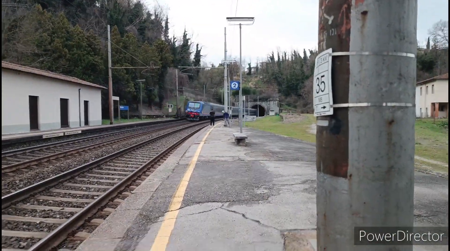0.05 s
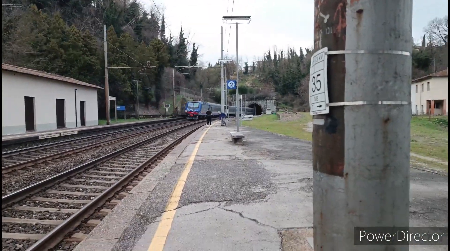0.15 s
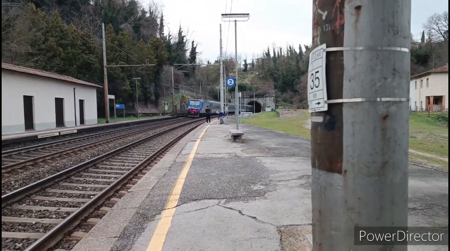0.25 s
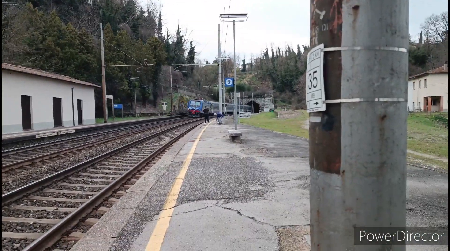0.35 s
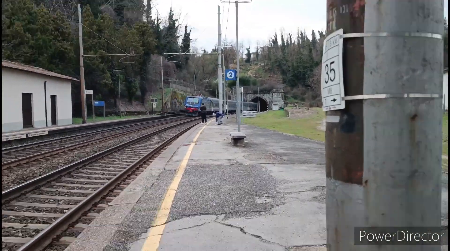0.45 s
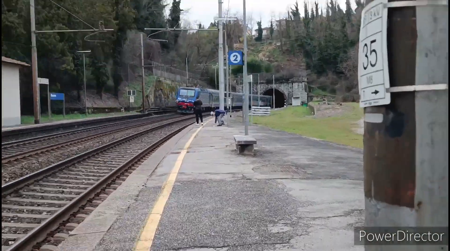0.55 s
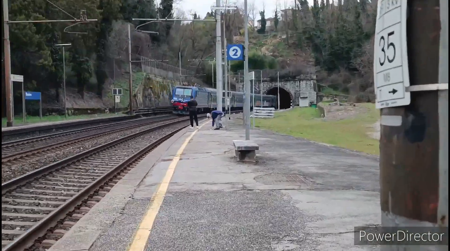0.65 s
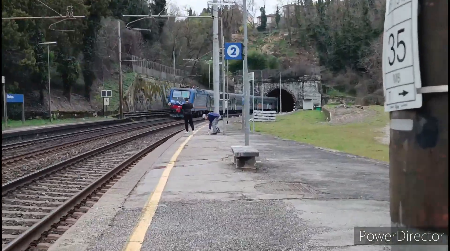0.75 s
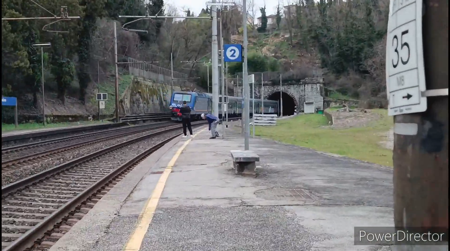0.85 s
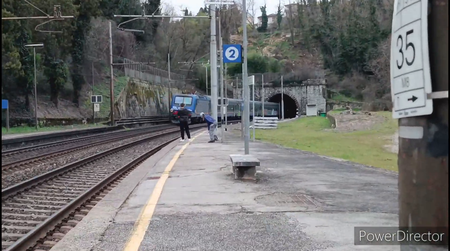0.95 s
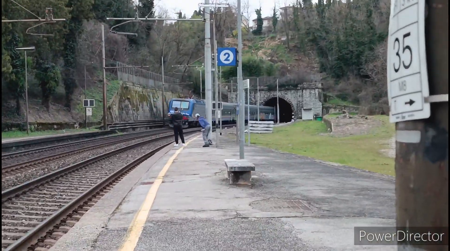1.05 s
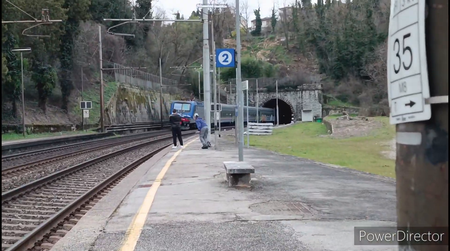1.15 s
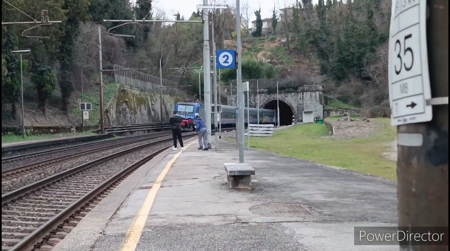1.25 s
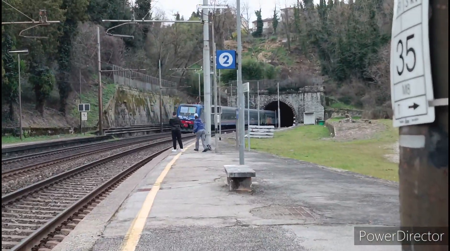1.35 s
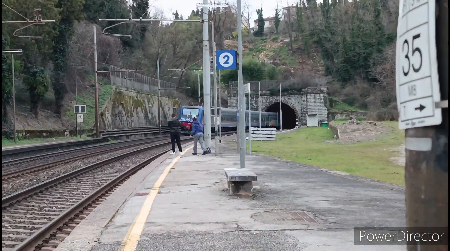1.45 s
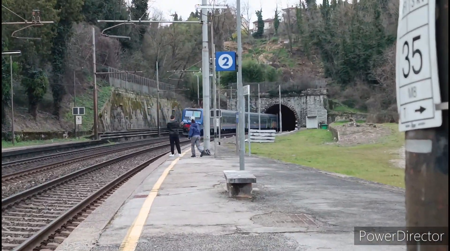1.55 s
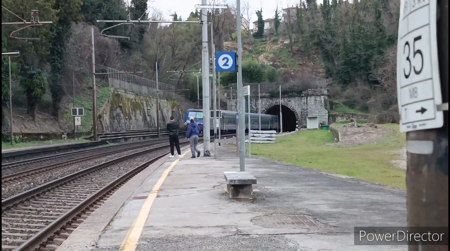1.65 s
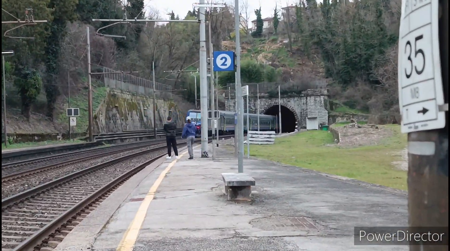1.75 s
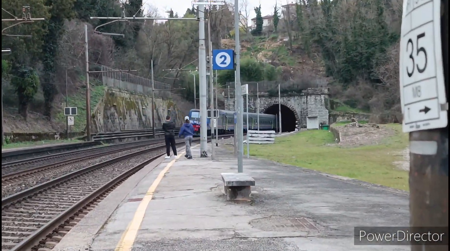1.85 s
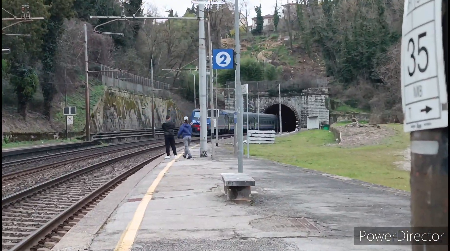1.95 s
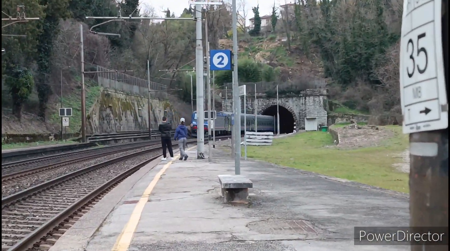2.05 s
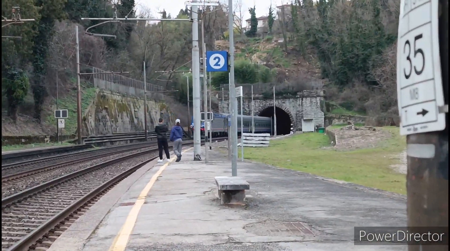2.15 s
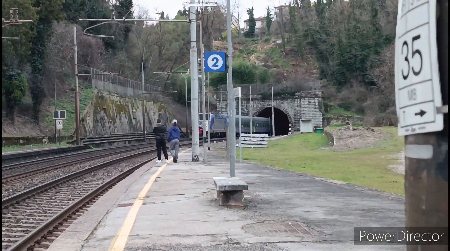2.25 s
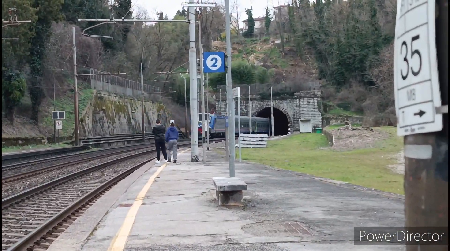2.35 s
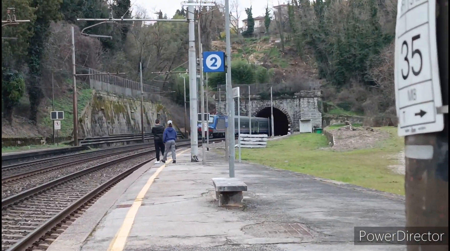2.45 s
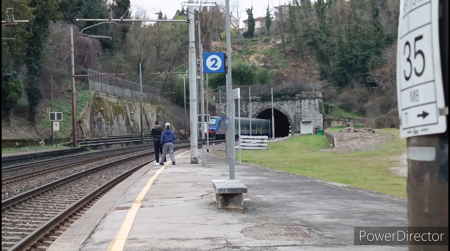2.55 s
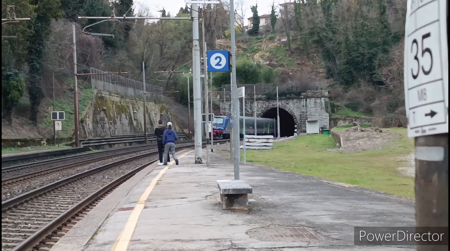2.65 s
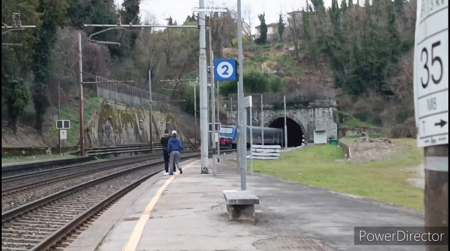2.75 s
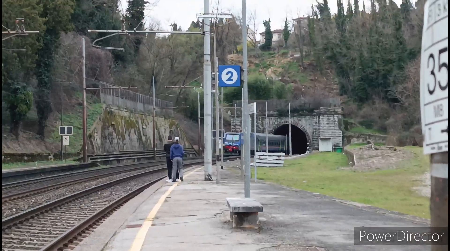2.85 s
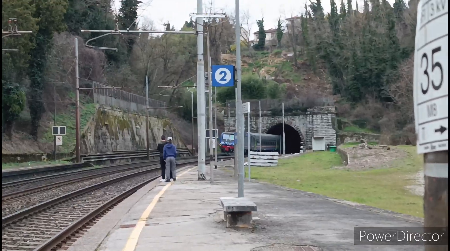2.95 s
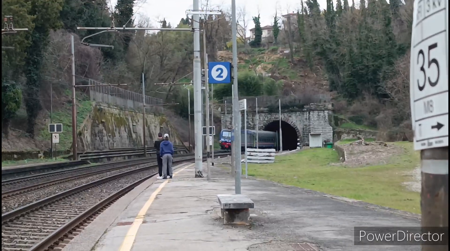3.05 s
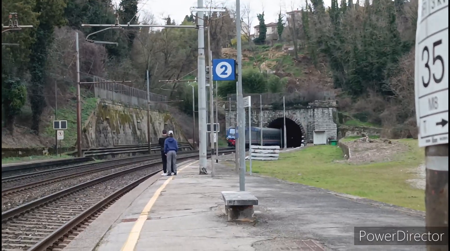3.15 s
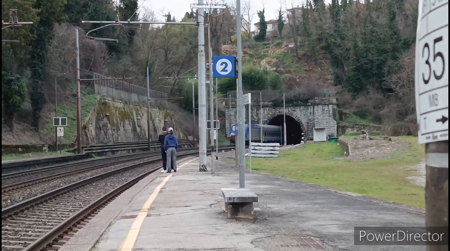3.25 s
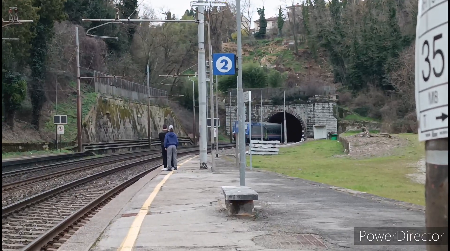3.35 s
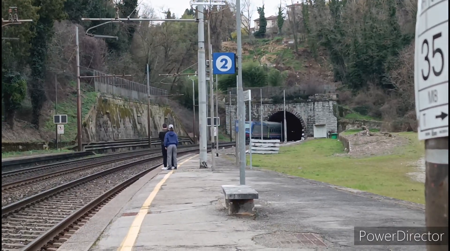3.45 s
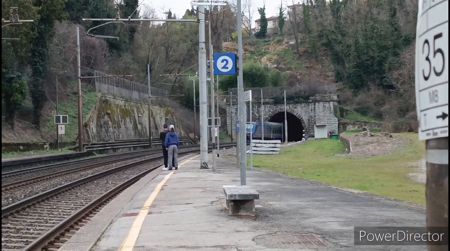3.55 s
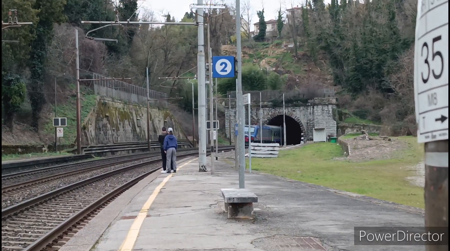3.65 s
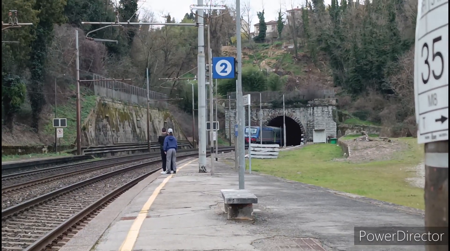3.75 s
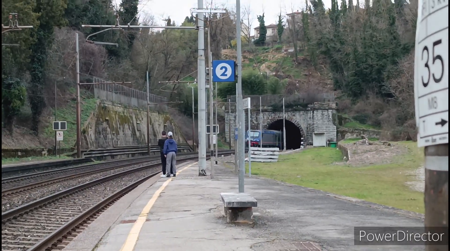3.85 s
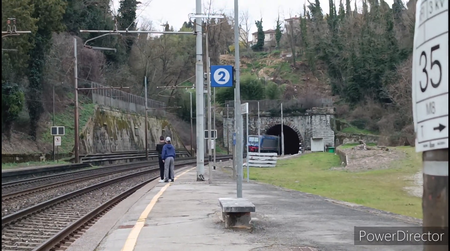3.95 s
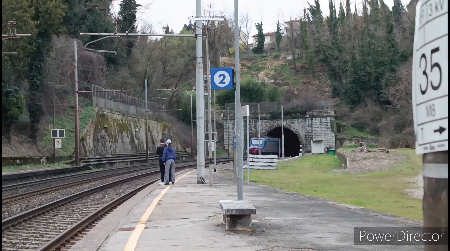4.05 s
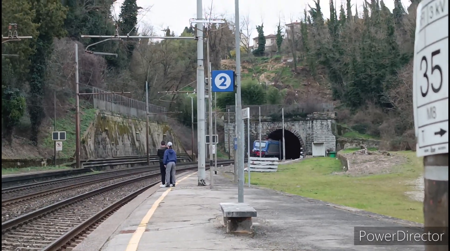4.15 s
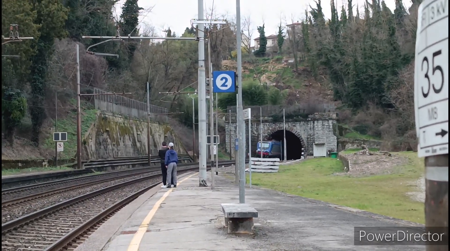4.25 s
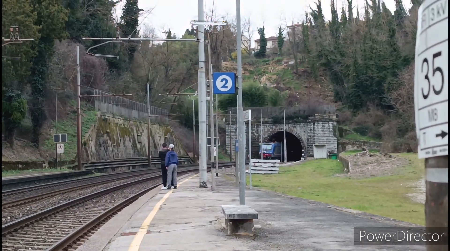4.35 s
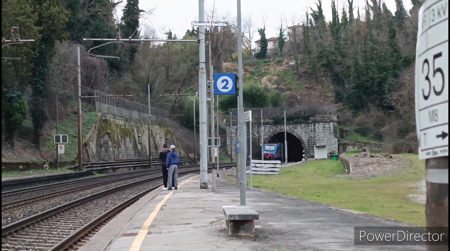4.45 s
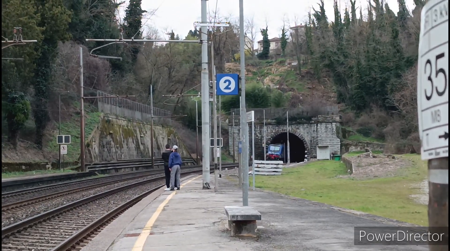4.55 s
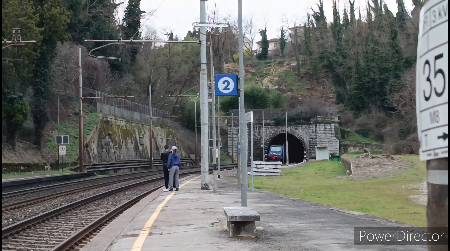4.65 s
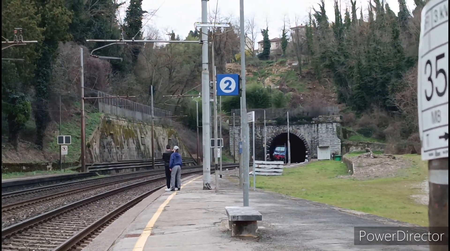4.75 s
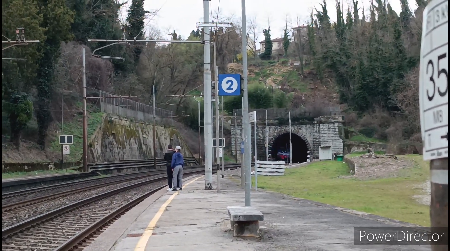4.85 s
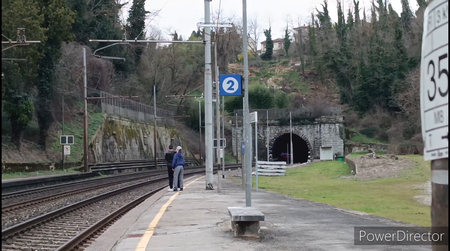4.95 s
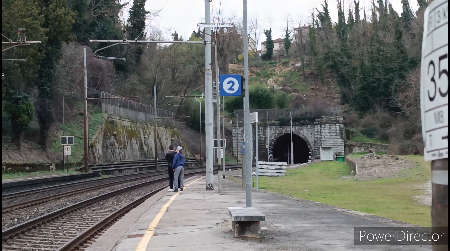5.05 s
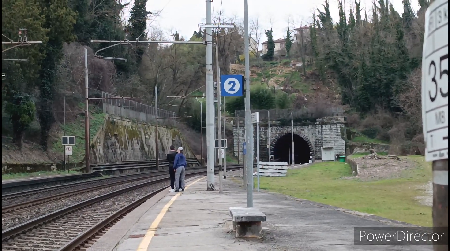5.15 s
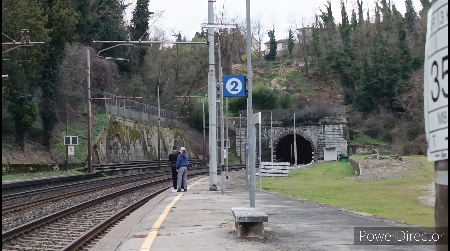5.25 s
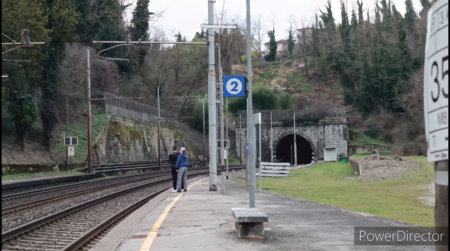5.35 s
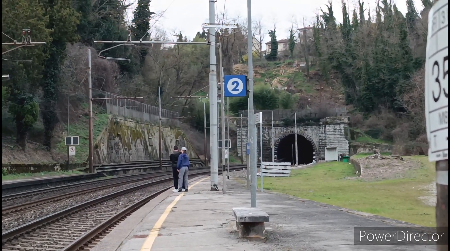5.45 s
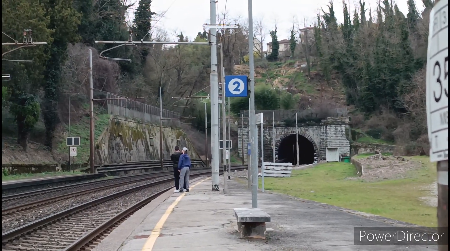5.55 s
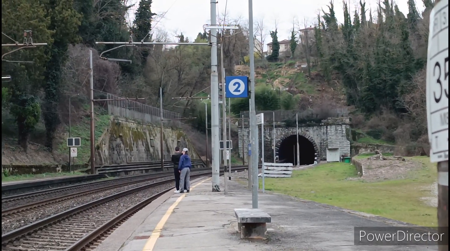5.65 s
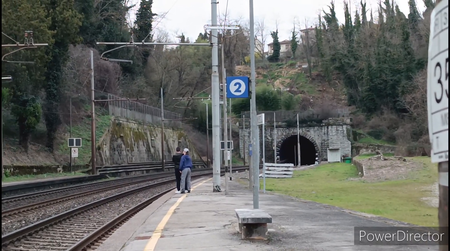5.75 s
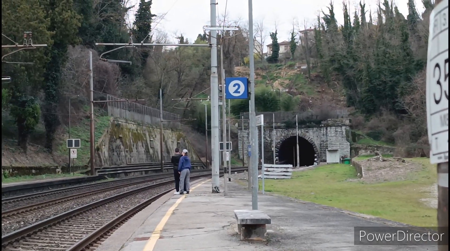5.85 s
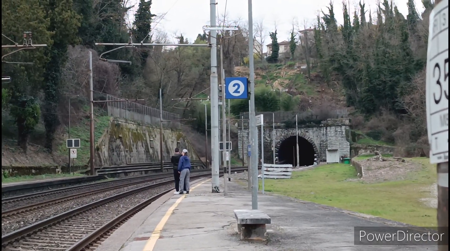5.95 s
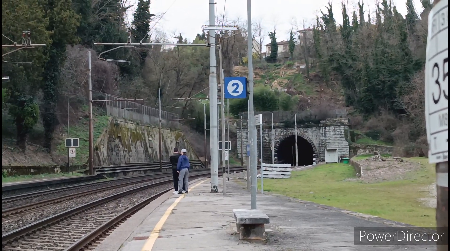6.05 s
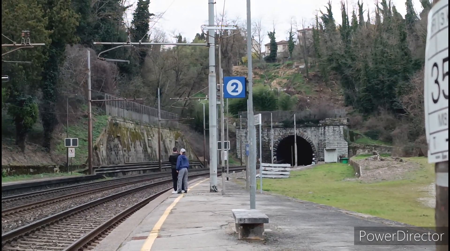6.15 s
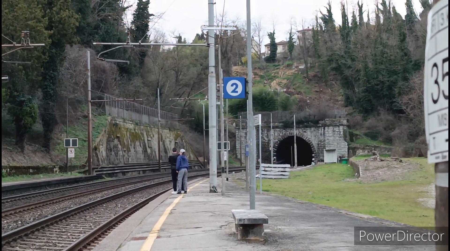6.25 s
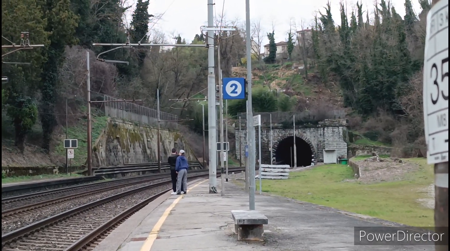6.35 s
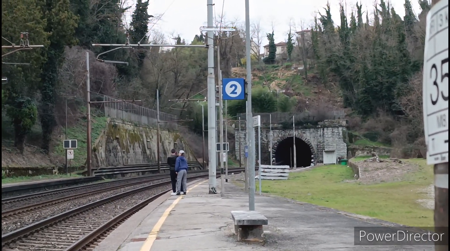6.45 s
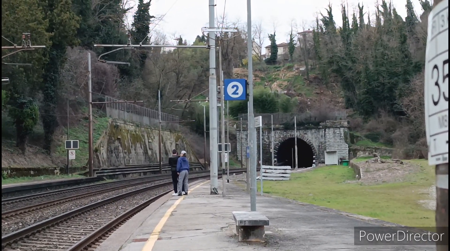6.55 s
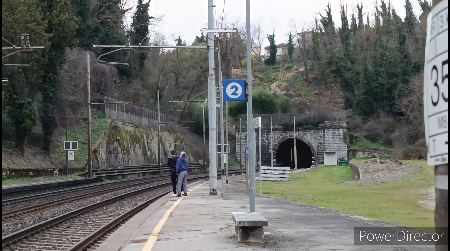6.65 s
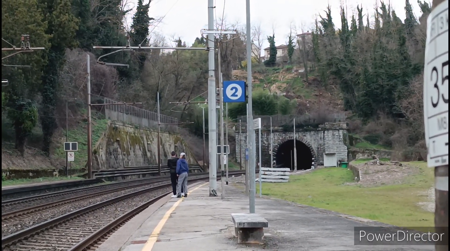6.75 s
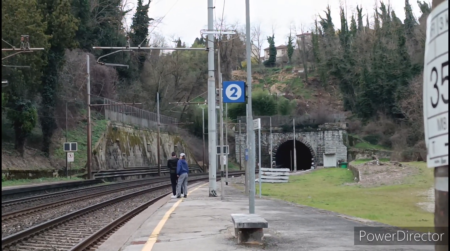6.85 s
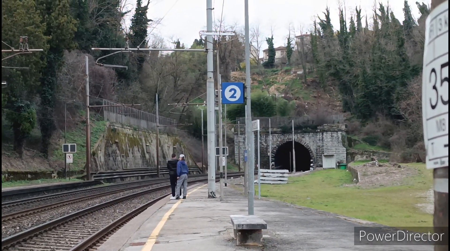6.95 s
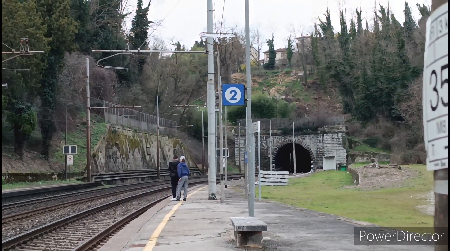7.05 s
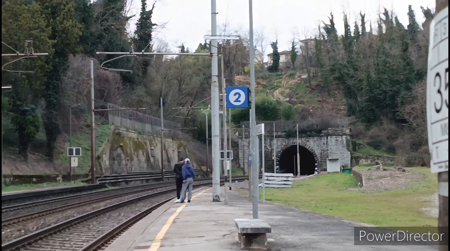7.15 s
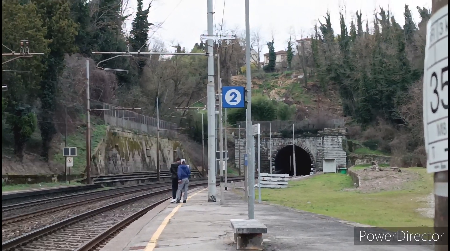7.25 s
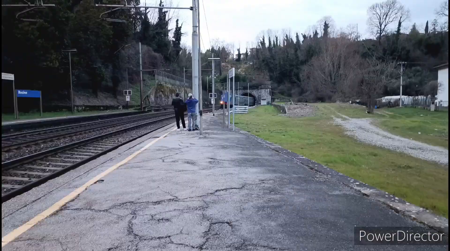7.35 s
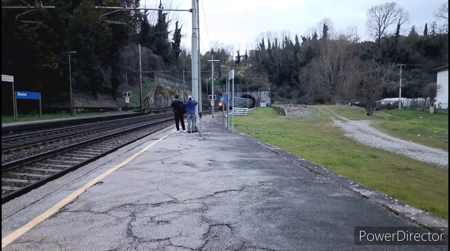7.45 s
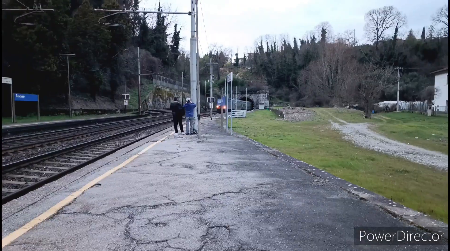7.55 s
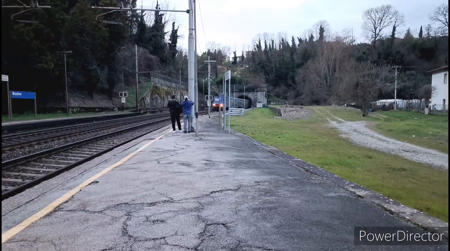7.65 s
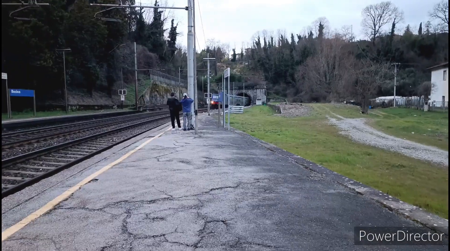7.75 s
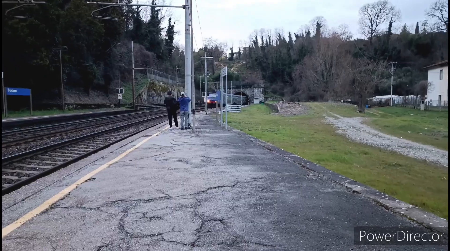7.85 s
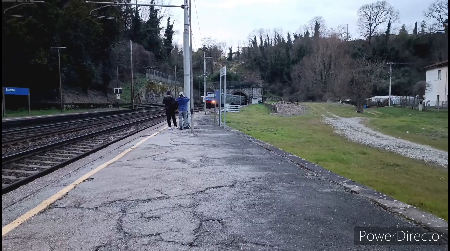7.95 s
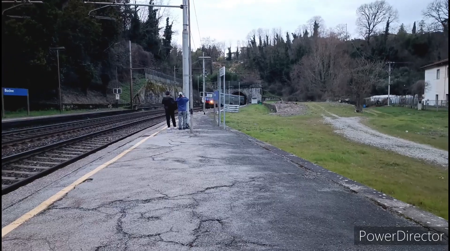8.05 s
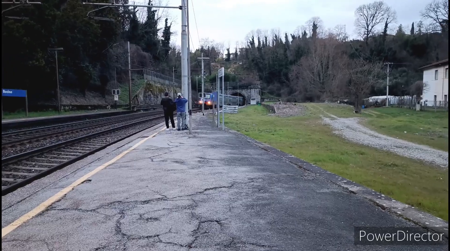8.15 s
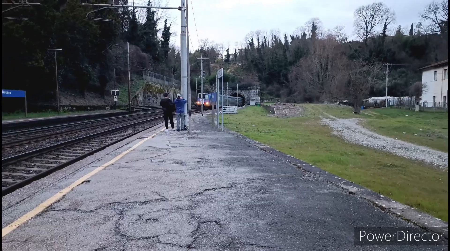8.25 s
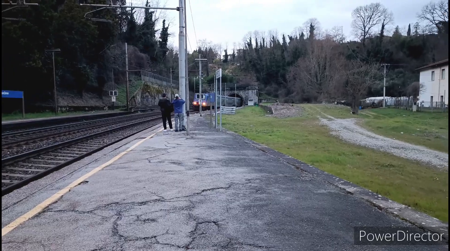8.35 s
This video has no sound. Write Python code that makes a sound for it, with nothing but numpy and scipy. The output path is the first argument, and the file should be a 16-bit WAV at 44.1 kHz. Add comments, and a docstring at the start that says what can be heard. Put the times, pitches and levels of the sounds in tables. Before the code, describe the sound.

An electric train rolls away round a curve, rumbling, hissing and squealing thinly as wind bumps the microphone; brief silence, then a second distant train.

```python
"""Station platform by a tunnel mouth: an electric train rolls slowly round a curve and draws away. Its bodies
boom near 200 Hz and the wheels roar (coloured noise); the flanges hiss (noise), ring (narrow noise bands) and
squeal (wavering sines). Wind bumps the microphone (gusts of low noise). After a short break the scene changes:
the sound fades in on a second train approaching from afar."""
import sys
import numpy as np
from scipy import signal
from scipy.fft import irfft, next_fast_len
from scipy.io import wavfile

SR = 44100
rng = np.random.default_rng(int(sys.argv[2]) if len(sys.argv) > 2 else 0)


def wrap_up_sound(samples):
    """Save the sound to the file named by the first command line argument, as 16-bit audio."""
    columns = np.atleast_2d(samples).T
    # keep every value between -1 and 1, then stretch to whole-number steps
    tamed = np.clip(columns, -1, 1)
    steps = np.round(tamed * 32767).astype(np.int16)
    wavfile.write(sys.argv[1], SR, steps)


N = 370881
TIME = np.arange(N) / SR
FREQS = np.maximum(np.fft.rfftfreq(next_fast_len(N, real=True), 1 / SR), 1)

# All table levels are relative; widths are half widths at half amplitude.
# Noise colours of open air, wind turbulence, deepest rumble: (frequency [Hz], density [dB])
AIR = [(330, 4), (480, -0.5), (800, -6.5), (1600, -18.5), (4000, -35), (6000, -19.5), (9000, -54)]
WIND = [(30, -48), (48, -40), (70, -2.5), (95, 3.5), (170, -0.5), (300, -5), (450, -20.5), (900, -38)]
DEEP = [(45, -30), (75, -6), (105, 1), (135, -1), (165, -13)]
# Noise colours of body rumble, wheel roar, rail hiss, wheel sizzle: (frequency [Hz], density [dB])
RUMBLE_AWAY = [(21, -96), (35, -49), (60, -28), (79, -19.5), (118, -15.5), (185, -0.5), (211, -1),
               (260, -7.5), (300, -8.5), (390, -26), (660, -120)]
RUMBLE_NEAR = [(21, -72), (40, -35), (92, -6), (141, -2), (204, -0.5), (279, -6), (386, -12), (409, -23),
               (560, -14.5), (730, -58), (1230, -120)]
ROAR_AWAY = [(290, 12), (350, 8.5), (410, 11.5), (500, 4), (590, -1.5), (715, 7), (850, 1), (1030, 7),
             (1330, 6.5), (1480, -5.5), (1930, -2.5), (2300, -3), (3500, -4.5), (5200, -18)]
ROAR_NEAR = [(280, -33), (480, 2), (495, -3), (708, 6), (831, 3), (994, 10), (1180, 4), (1340, 10),
             (1470, -8), (1770, -4.5), (1900, -2.5), (2440, -7), (5200, -11.5), (6760, -31), (11400, -120)]
HISS_AWAY = [(4400, -8), (5000, 8.5), (5350, 3.5), (5700, 10), (6100, 5), (6600, 10), (7600, 4.5),
             (7950, 9.5), (8480, 7), (8750, -22), (9000, -70)]
HISS_NEAR = [(2760, -31), (4700, -22), (5410, -10), (5700, -5.5), (5980, -16), (6200, -5.5), (7360, -8),
             (7670, -8), (8410, -8), (9000, -34), (11700, -46), (19800, -120)]
SIZZLE = [(5880, -113), (10000, -24), (10600, -19), (12000, -8.5), (13700, -1), (14200, 2), (15000, 4.5),
          (15400, 1.5), (15500, -14)]
# Arrival from the left: (frequency [Hz], direct share [0-1], lag at right ear [ms])
EARS_AWAY = [(60, 0.6, 0), (130, 0.98, 0), (212, 1, 0.1), (337, 0.98, 0), (483, 0.6, 0.19),
             (870, 0.38, 0.11), (1087, 0.7, 0.46), (1310, 0.82, 0.48), (1510, 0.35, 0.42),
             (1890, 0.68, 0.53), (2780, 0, 0.32), (4700, 0, 0.52), (5500, 0.35, 0.554), (6300, 0, 0.52),
             (7000, 0.6, .495), (8000, 0.7, 0.508), (12000, 1, 0.483), (14700, 0.5, 0.542)]
EARS_NEAR = [(59.6, 1, 0), (282, 0.99, 0.06), (480, 0.59, 0.23), (795, 0.66, 0.38), (970, 0.58, 0.56),
             (1340, 1, 0.45), (1560, 0.72, 0.48), (1900, 0.66, 0.53), (2600, 0.12, 0.58),
             (7000, 0.25, 0.584), (14700, .45, 0.89)]
# Balance of the ears: (frequency [Hz], left minus right [dB])
BALANCE_DB = [(200, -0.5), (410, -2.5), (680, 2.5), (1300, 0.5), (2400, -3), (4200, -0.5), (5600, 3),
              (7000, 6.5), (9000, 3.5), (14000, 4)]
# Drone, 1 kHz throb, main body resonance: (frequency [Hz], width [Hz], level [dB])
DRONE_MODE = [(1347, 25, 0)]
THROB_MODES = [(710, 30, -39), (990, 70, 9), (1080, 45, -12), (1240, 48, 14), (1260, 27, -11)]
BODY_MODE = [(201, 18, 0)]
# Rail modes: within the hiss, under plain rolling, under the second train;
# then wheel modes: rubbed cluster, within the sizzle: (frequency [Hz], width [Hz], level [dB])
RAIL_MODES = [(6641, 9, -11.5), (6712, 15, -10), (6858, 16, -6), (7253, 10, -9), (7535, 12, -14)]
SONG_MODES = [(5285, 25, -9), (5400, 40, -10), (5496, 30, -7), (5600, 55, -5), (5730, 70, -6.5),
              (5850, 40, -11)]
RAIL_NOTE = [(5640, 80, -5), (5760, 32, 0), (6660, 50, -10), (7030, 110, -8), (7190, 66, -3.5),
             (7340, 70, -5)]
WHEEL_MODES = [(6930, 57, -5), (7055, 50, -8), (7114, 45, -10), (7300, 90, -9)]
SIZZLE_MODES = [(12600, 40, -6), (13120, 45, -5), (13420, 35, -5), (13900, 25, -4), (14116, 16, -1),
                (14262, 16, 3), (14356, 12, 2), (14460, 30, 3), (14578, 18, 3), (14795, 20, 5),
                (15071, 22, 3), (15290, 40, 1)]
# Wind gusts: (time [s], half length [s], left level [dB], right level [dB])
GUSTS = [(0.112, 0.073, -46, -38), (0.3, 0.022, -53.5, -25.5), (0.622, 0.029, -47, -25),
         (1.377, 0.065, -33.5, -38), (1.676, 0.039, -30.5, -46), (1.846, 0.071, -41, -35),
         (2.028, 0.054, -35.5, -32.5), (2.283, 0.15, -41, -34.5), (4.646, 0.013, -50, -27.5),
         (5.3, 0.055, -52, -34), (6.122, 0.03, -27.5, -29), (6.422, 0.033, -47, -29),
         (6.53, 0.022, -29, -44), (6.984, 0.038, -34, -45), (7.114, 0.022, -31.5, -47),
         (7.182, 0.052, -53, -33), (7.291, 0.033, -41, -16.5)]
# Body booms on uneven track: (time [s], half length [s], rise [dB])
JOLTS = [(0.03, 0.052, 4.5), (2.162, 0.023, 7), (2.436, 0.065, 5.5), (3.493, 0.062, 5), (3.776, 0.066, 3.5),
         (4.366, 0.012, 5.5), (4.857, 0.05, 4.5), (5.89, 0.021, 5.5), (8.314, 0.022, 4.5)]
# Dull knocks: (time [s], frequency [Hz], peak level [dB])
KNOCKS = [(0.184, 253, -19), (2.428, 217, -22), (6.113, 188, -22.5)]
# Small sharp ticks: (time [s], level [dB])
TICKS = [(6.545, -35), (7.112, -45)]
# Falling whine, faint whistle, puff as the sound returns, faint arching squeal of the second train:
# (time [s], frequency [Hz], level [dB])
WHINE = [(0.4, 454, -52), (0.56, 450, -51), (0.72, 438, -60), (0.81, 427, -35.5), (0.97, 408.3, -45),
         (1.05, 409, -36.5), (1.2, 398, -69)]
WHISTLE = [(6.49, 2900, -69), (6.53, 2960, -59), (6.63, 2730, -62), (6.73, 2540, -60), (6.83, 2450, -65)]
PUFF = [(7.386, 1300, -59), (7.398, 1124, -47), (7.412, 850, -52), (7.43, 650, -77)]
FAR_SQUEAL = [(7.62, 3260, -63), (7.7, 4050, -55), (7.77, 4400, -56), (7.84, 4070, -58), (7.92, 3440, -64)]
# Short wheel squeaks, second train: (time [s], half length [s], level [dB])
SQUEAKS = [(7.978, 0.013, -41), (8.048, 0.0072, -52), (8.085, 0.014, -51), (8.12, 0.014, -45)]
# Flange after flange pressing on the curve's rail:
# (start [s], length [s], rub level [dB], wheel ring level [dB])
RUBS = [(0.034, 0.071, 1.5, 9), (0.315, 0.34, -2, 6), (0.615, 0.15, -0.5, 7.5), (0.996, 0.17, -5, 2.5),
        (1.214, 0.093, -1, 10), (1.432, 0.26, -1.5, 4), (1.76, 0.2, 1.5, 5), (2.172, 0.32, -1.5, 1.5),
        (2.84, 0.59, -2, -1), (3.62, 0.96, -2, 1.5), (4.626, 0.17, -3.5, 7), (4.945, 0.048, -8, -15),
        (5.86, 0.17, 0, 7.5), (6.237, 0.25, 2, 4.5), (6.54, 0.2, 4, 16.5), (6.865, 0.066, 2, 19)]
# Squeal pitches: mode name -> frequency [Hz]
SQUEAL_HZ = {"low": 14356, "middle": 14769, "high": 15071}
# Thin squeals: (start [s], length [s], level [dB], mode name)
SQUEALS = [(1.06, .2, -50, "middle"), (1.3, 0.15, -41.5, "middle"), (1.57, 0.5, -50, "middle"),
           (6.552, 0.32, -49, "middle"), (0.72, 0.91, -48, "high"), (2.33, 1.0, -41, "high"),
           (7.382, 0.87, -42, "low"), (8.318, .1, -37, "low")]

BREAK_START_S, BREAK_END_S = 7.326, 7.382
FADE_IN_S = 0.097  # time constant
CUTOFF_HZ = 15550
THROB_PER_S, THROB_CENTER_S = 7.32, 0.108
SQUEAK_HZ = 1907
RUMBLE_FADE_DB_PER_S, ROAR_FADE_DB_PER_S, HISS_FADE_DB_PER_S = 0.92, 2, 5.5
RING_FADE_DB_PER_S, SIZZLE_FADE_DB_PER_S = 3, 3
SIZZLE_PEAK_S = 1.0  # sizzle grows until then, fades after
APPROACH_DB_PER_S = 1.1
RUB_ATTACK_S, RUB_RELEASE_S = 0.071, 0.08
SQUEAL_ATTACK_S, SQUEAL_RELEASE_S = 0.11, 0.06
CURVE_END_S, RAIL_SONG_END_S = 3.58, 4.85
GRAZE_DB, EASED_DB = -8.5, -14  # flange rub between the RUBS: in the curve, after it eases
GRAZE_RING_DB, EASED_RING_DB = 0, -4
HISS_FOLLOWS = 0.75  # share of the rub's dB swing that the hiss follows


def from_db(db):
    """Decibels to gain."""
    return 10 ** (np.asarray(db) / 20)


def rms_one(x):
    """Scale to unit rms."""
    return x / np.sqrt(np.mean(x ** 2) + 1e-20)


def at_freqs(points):
    """Gain at every frequency, interpolated in dB over log frequency."""
    hz, db = np.transpose(points)
    return from_db(np.interp(np.log(FREQS), np.log(hz), db))


def band(points):
    """Gain as at_freqs, with steep skirts outside the table."""
    below = points[0][0] / FREQS
    above = FREQS / points[-1][0]
    outside = np.maximum(np.maximum(below, above), 1)
    return at_freqs(points) / outside ** 20


def resonances(modes):
    """Summed gain of resonance peaks."""
    return sum(from_db(db) / (1 + ((FREQS - hz) / width) ** 2) for hz, width, db in modes)


def white(count):
    """Spectra of unrelated white noises."""
    shape = (count, len(FREQS))
    return rng.standard_normal(shape) + 1j * rng.standard_normal(shape)


def noise(gain):
    """Mono noise of the given colour, rms 1."""
    return rms_one(irfft(white(count=1)[0] * gain)[:N])


def drift(rate_hz):
    """Low-passed random wander, rms 1, drawn at every 40th sample and interpolated."""
    pole = np.exp(-2 * np.pi * rate_hz * 40 / SR)
    draws = rng.standard_normal(N // 40 + 1002)
    slow = signal.lfilter([1], [1, -2 * pole, pole * pole], draws)[1000:]  # drop filter start-up
    return np.interp(np.arange(N) / 40, np.arange(len(slow)), rms_one(slow))


def wide_noise(gain, ears):
    """Stereo noise of about rms 1: a direct share reaches the right ear late, the rest is scattered."""
    hz, *columns = np.transpose(ears)
    direct, lag_ms = [np.interp(np.log(FREQS), np.log(hz), column) for column in columns]
    direct = np.clip(direct, 0, 1)
    lean = np.sqrt(at_freqs(BALANCE_DB))  # half the balance on each ear
    source, scattered = white(count=2) * rms_one(gain) * np.sqrt(N / 2)
    late = np.exp(-2j * np.pi * FREQS * lag_ms / 1000)
    right = direct * late * source + np.sqrt(1 - direct ** 2) * scattered
    return irfft(np.array([source * lean, right / lean]))[:, :N]


def ringing(modes, ears, restless_db):
    """Narrow noise band per mode, each swelling and sinking on its own."""
    return sum(from_db(db + restless_db * drift(9.6)) * wide_noise(resonances([(hz, width, 0)]), ears)
               for hz, width, db in modes)


def swell(center_s, half_length_s):
    """Bell-shaped rise and fall."""
    return np.exp(-0.5 * ((TIME - center_s) / half_length_s) ** 2)


def held(start_s, length_s, attack_s, release_s):
    """Linear rise centred on the start, hold, exponential decay."""
    rise = np.clip((TIME - start_s) / attack_s + 0.5, 0, 1)
    return rise * np.exp(-np.clip(TIME - start_s - length_s, 0, 2) / release_s)


def curve_level(s, db):
    """Gain along a level curve, with short edges."""
    return from_db(np.interp(TIME, s, db)) * held(s[0], s[-1] - s[0], attack_s=0.0064, release_s=0.01)


def glide(curve, waver):
    """Sine along a curve of pitch and level, with a random relative pitch waver."""
    s, hz, db = np.transpose(curve)
    pitch_hz = np.interp(TIME, s, hz) * (1 + waver * drift(40.0))
    tone = np.sin(2 * np.pi * np.cumsum(pitch_hz) / SR)
    return curve_level(s, db) * tone * from_db([[-2.0], [1.5]])


def blurred(curve, width_hz):
    """Narrow noise band along a curve of pitch and level: random drift on a sine and a cosine."""
    s, hz, db = np.transpose(curve)
    phase = 2 * np.pi * np.cumsum(np.interp(TIME, s, hz)) / SR
    strands = drift(width_hz) * np.sin(phase) + drift(width_hz) * np.cos(phase)
    return curve_level(s, db) * strands / np.sqrt(2) * from_db([[-1.5], [1.5]])


def air(level_db):
    """Steady open air of the valley: faint noise, left as the train recedes."""
    return from_db(level_db) * wide_noise(band(AIR), EARS_AWAY)


def wind(level_db):
    """Each gust buffets the two channels with unrelated low turbulence."""
    push = sum(from_db([[left], [right]]) * swell(s, length) for s, length, left, right in GUSTS)
    return from_db(level_db) * push * np.array([noise(band(WIND)), noise(band(WIND))])


def drone(level_db):
    """Narrow steady band that comes forward as the roar recedes."""
    return from_db(level_db) * wide_noise(resonances(DRONE_MODE), EARS_AWAY)


def ticks(level_db, decay_s):
    """Bright noise ticks, instant onset, exponential decay."""
    decays = sum(from_db(db + level_db) * (TIME >= s) * np.exp(-abs(TIME - s) / decay_s)
                 for s, db in TICKS)
    return decays * wide_noise(band(SIZZLE), EARS_AWAY)


def knocks(rise_s):
    """Each knock rings for a few low cycles."""
    out = np.zeros(N)
    for s, hz, db in KNOCKS:
        age_s = np.clip(TIME - s, 0, 0.2)
        envelope = age_s / rise_s * np.exp(1 - age_s / rise_s)  # peak 1
        out += from_db(db) * envelope * np.sin(2 * np.pi * hz * age_s)
    return out


def deep_rumble(level_db, fade_db_per_s):
    """Deepest rumble, strong only while the train is near."""
    return from_db(level_db - fade_db_per_s * TIME) * wide_noise(band(DEEP), EARS_AWAY)


def hum(level_db):
    """Main body resonance: a narrow hum within the rumble."""
    return from_db(level_db - RUMBLE_FADE_DB_PER_S * TIME) * wide_noise(resonances(BODY_MODE), EARS_AWAY)


def throb(level_db, half_length_s, fade_db_per_s):
    """Short even swells near 1 kHz, opposite in sign at the two ears, fading as the train recedes."""
    from_beat_s = (((TIME - THROB_CENTER_S) * THROB_PER_S + 0.5) % 1 - 0.5) / THROB_PER_S
    beat = np.exp(-0.5 * (from_beat_s / half_length_s) ** 2)
    return from_db(level_db - fade_db_per_s * TIME) * beat * noise(resonances(THROB_MODES)) * [[1], [-1]]


def rail_song(level_db, fade_db_per_s):
    """Rolling wheels keep the rails ringing until the train is in the tunnel."""
    in_the_open = held(-1, 1 + RAIL_SONG_END_S, RUB_ATTACK_S, RUB_RELEASE_S)
    song = ringing(SONG_MODES, EARS_AWAY, restless_db=3.0)
    return from_db(level_db - fade_db_per_s * TIME) * in_the_open * song


def jolts():
    """Rise of the rumble [dB] as the cars lurch."""
    return sum(db * swell(s, length) for s, length, db in JOLTS)


def rolling(boom, roar, rumble_colour, roar_colour, ears, rumble_db, roar_db, shake_db):
    """Car bodies boom near 200 Hz; rough wheels on rough rail roar above them (boom, roar in dB)."""
    bodies = from_db(boom + rumble_db + shake_db * drift(24.0)) * wide_noise(band(rumble_colour), ears)
    wheels = from_db(roar + roar_db + 0.95 * drift(18.5)) * wide_noise(band(roar_colour), ears)
    return bodies + wheels


def rubbing():
    """Flange rub and wheel ring [dB]: powers of light grazing and of each rub added."""
    def rub_envelope(start_s, length_s):
        return held(start_s, length_s, RUB_ATTACK_S, RUB_RELEASE_S)

    in_curve = rub_envelope(-1, 1 + CURVE_END_S)
    power = from_db([[EASED_DB], [EASED_RING_DB]]) ** 2
    power = power + (from_db([[GRAZE_DB], [GRAZE_RING_DB]]) * in_curve) ** 2
    for start_s, length_s, rub_db, ring_db in RUBS:
        power = power + (from_db([[rub_db], [ring_db]]) * rub_envelope(start_s, length_s)) ** 2
    return 10 * np.log10(power)


def flanges(hiss, ring, sizzle, hiss_colour, rail_modes, ears,
            hiss_db, rail_db, ring_db, sizzle_db, singing_db, chatter_db):
    """Flanges slip unevenly: rail hisses, wheel modes ring, top sizzles (hiss, ring, sizzle in dB)."""
    slip = chatter_db * drift(12.5)
    rail = from_db(hiss_db) * wide_noise(band(hiss_colour), ears)
    rail = rail + from_db(rail_db) * ringing(rail_modes, ears, restless_db=4.5)
    wheel = from_db(ring + ring_db + slip) * ringing(WHEEL_MODES, ears, restless_db=1.5)
    top = from_db(sizzle_db) * wide_noise(band(SIZZLE), ears)
    top = top + from_db(singing_db) * wide_noise(resonances(SIZZLE_MODES), ears)
    return from_db(hiss + HISS_FOLLOWS * slip) * rail + wheel + from_db(sizzle + slip) * top


def squeal(mode, level_db, waver_hz, flutter_db):
    """One wheel mode locks on and sings, wavering; each ear has its own flutter."""
    sounding = sum(from_db(db + level_db) * held(s, length, SQUEAL_ATTACK_S, SQUEAL_RELEASE_S)
                   for s, length, db, name in SQUEALS if name == mode)
    phase = 2 * np.pi * np.cumsum(SQUEAL_HZ[mode] + waver_hz * drift(29.0)) / SR
    ears = [np.sin(phase + 0.5 * drift(2.2)) * from_db(pan_db + flutter_db * drift(25))
            for pan_db in (2.2, -2.2)]
    return sounding * np.array(ears)


def squeaks(level_db, waver_hz):
    """Brief slips excite one low wheel mode of unsteady pitch."""
    slips = sum(from_db(db + level_db) * swell(s, length) for s, length, db in SQUEAKS)
    phase = 2 * np.pi * np.cumsum(SQUEAK_HZ + waver_hz * drift(79.6)) / SR
    return slips * np.sin(phase) * from_db([[-1.5], [1.5]])


def second_train():
    """Far off and nearly steady, growing a little as it comes closer."""
    closer = APPROACH_DB_PER_S * np.maximum(TIME - BREAK_END_S, 0)
    out = rolling(closer + jolts(), closer, RUMBLE_NEAR, ROAR_NEAR, EARS_NEAR,
                  rumble_db=-39.0, roar_db=-38.0, shake_db=0.5)
    out += flanges(closer, closer, closer, HISS_NEAR, RAIL_NOTE, EARS_NEAR,
                   hiss_db=-52.0, rail_db=-56.5, ring_db=-70,
                   sizzle_db=-48.5, singing_db=-59, chatter_db=2.0)
    out += blurred(FAR_SQUEAL, width_hz=180)
    out += squeal("low", level_db=-2.0, waver_hz=2.1, flutter_db=3.0)
    return out + squeaks(level_db=5.0, waver_hz=45)


def first_train():
    """Draws away through the curve, jolting and rubbing; each part fades at its own rate."""
    rub, ring = rubbing()
    boom = jolts() - RUMBLE_FADE_DB_PER_S * TIME
    roar = -ROAR_FADE_DB_PER_S * TIME
    hiss = HISS_FOLLOWS * rub - HISS_FADE_DB_PER_S * TIME
    sizzle = rub - SIZZLE_FADE_DB_PER_S * abs(TIME - SIZZLE_PEAK_S)
    out = rolling(boom, roar, RUMBLE_AWAY, ROAR_AWAY, EARS_AWAY,
                  rumble_db=-33.0, roar_db=-34.5, shake_db=1.1)
    out += flanges(hiss, ring - RING_FADE_DB_PER_S * TIME, sizzle, HISS_AWAY, RAIL_MODES, EARS_AWAY,
                   hiss_db=-33.5, rail_db=-37, ring_db=-39.5,
                   sizzle_db=-33.5, singing_db=-35.5, chatter_db=1.56)
    out += squeal("middle", level_db=7.0, waver_hz=1.8, flutter_db=4.0)
    out += squeal("high", level_db=0.0, waver_hz=7.7, flutter_db=6.0)
    out += glide(WHINE, waver=0.01) + glide(WHISTLE, waver=0.0147)
    out += rail_song(level_db=-42.5, fade_db_per_s=3.5)
    out += knocks(rise_s=0.0045)
    out += deep_rumble(level_db=-43.5, fade_db_per_s=2.9)
    out += hum(level_db=-37.5)
    return out + throb(level_db=-36.0, half_length_s=0.014, fade_db_per_s=2.0)


def scene():
    """First train draws away; after a brief break the scene changes, and a second train fades in after a puff."""
    away = air(level_db=-48.5) + wind(level_db=-3.5) + drone(level_db=-56.0)
    away += ticks(level_db=-4.0, decay_s=0.021) + first_train()
    fade_out = np.exp(-np.clip(TIME - BREAK_START_S, 0, 0.1) / 0.0032)
    fade_in = 1 - np.exp(-np.maximum(TIME - BREAK_END_S, 0) / FADE_IN_S)
    return away * fade_out + blurred(PUFF, width_hz=240) + second_train() * fade_in


def record(dry):
    """Steep elliptic low-pass cuts the top."""
    low_pass = signal.ellip(12, 0.2, 80, CUTOFF_HZ, fs=SR, output="sos")
    return signal.sosfilt(low_pass, dry)


dry = scene()
out = record(dry)
wrap_up_sound(out)
```